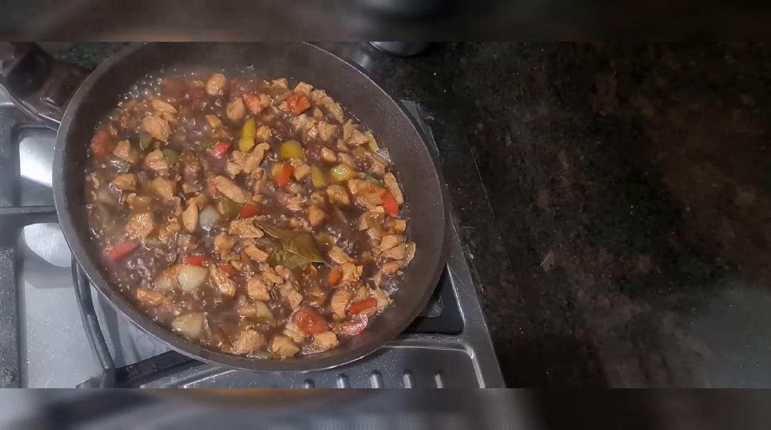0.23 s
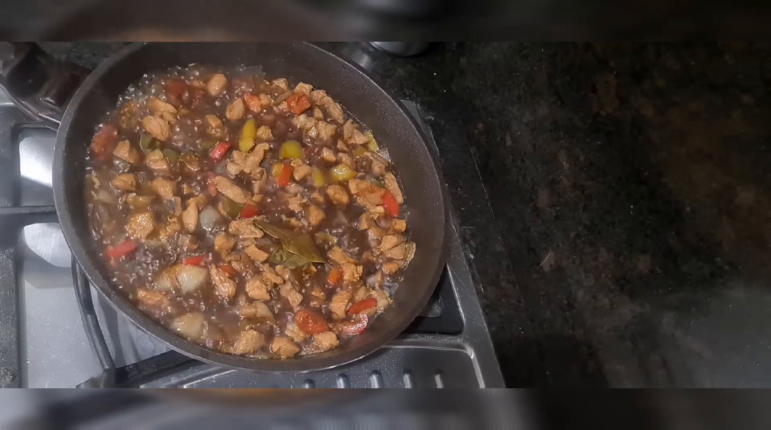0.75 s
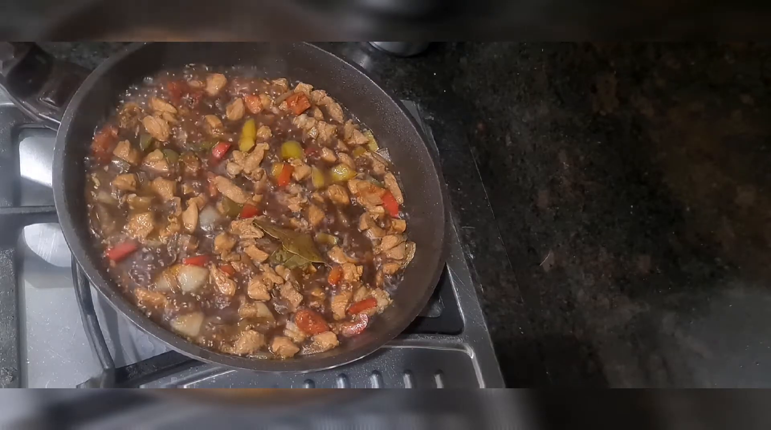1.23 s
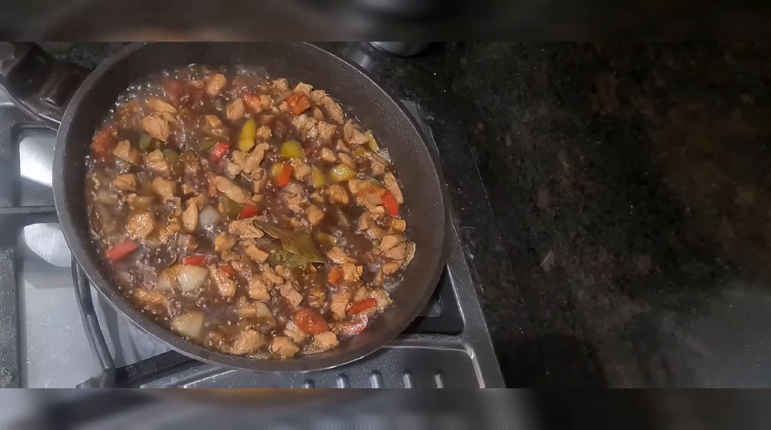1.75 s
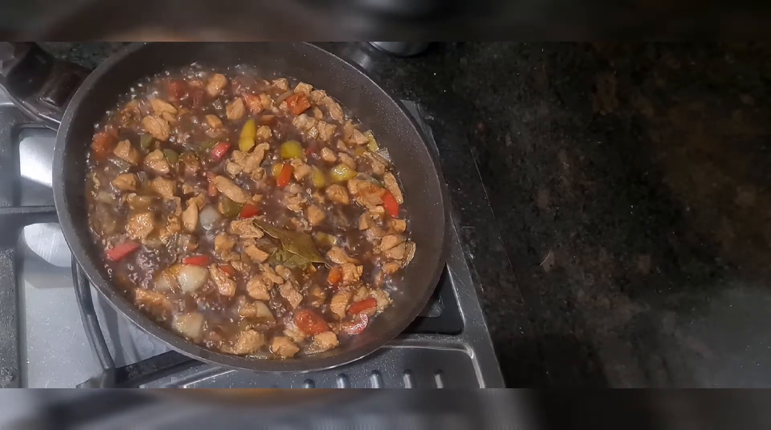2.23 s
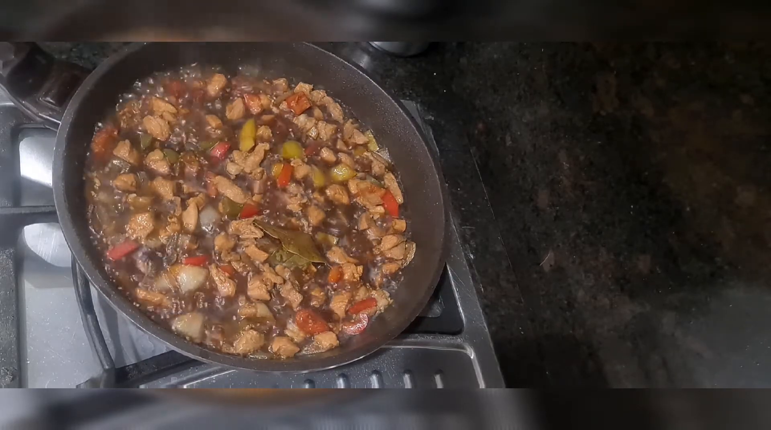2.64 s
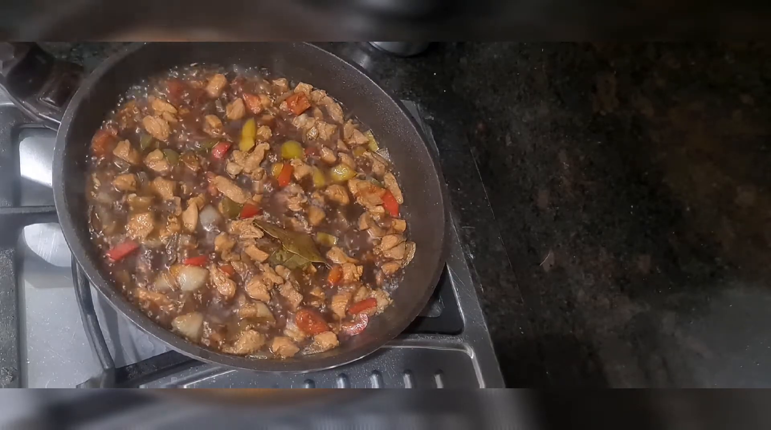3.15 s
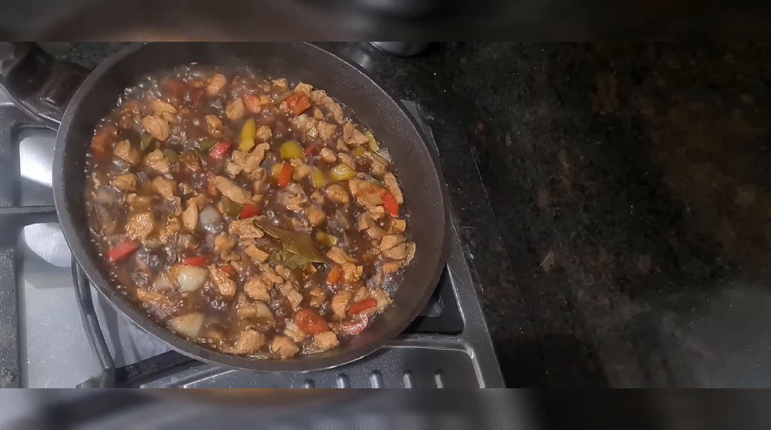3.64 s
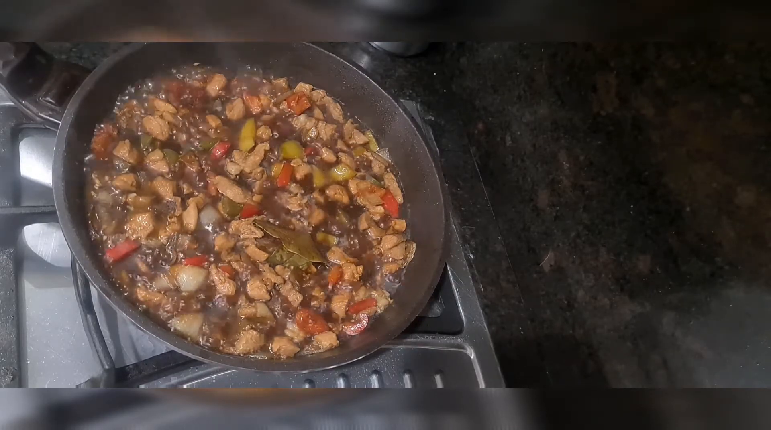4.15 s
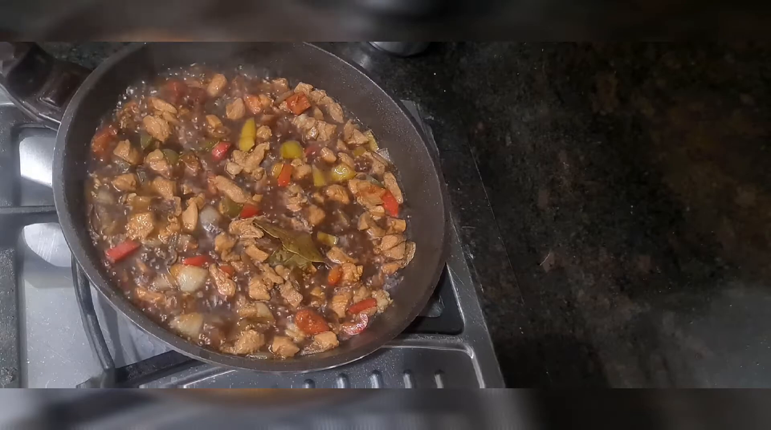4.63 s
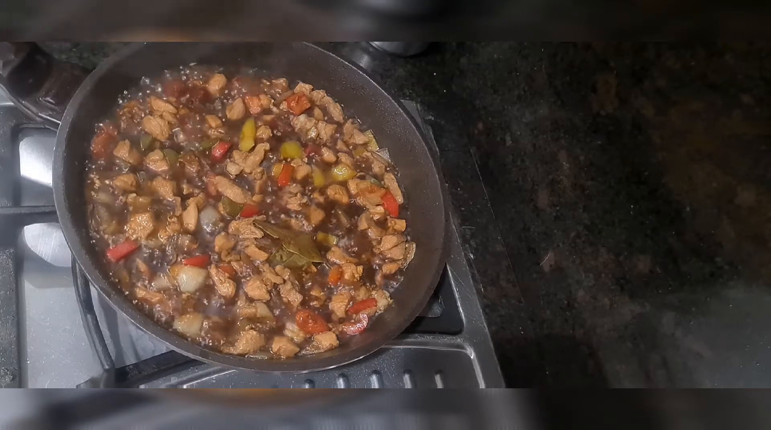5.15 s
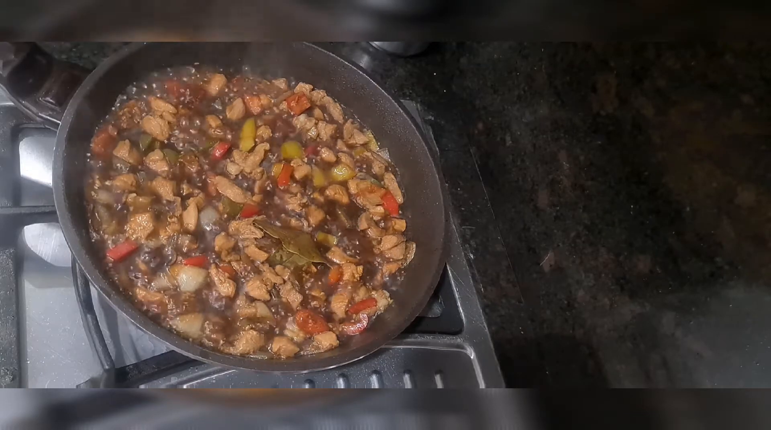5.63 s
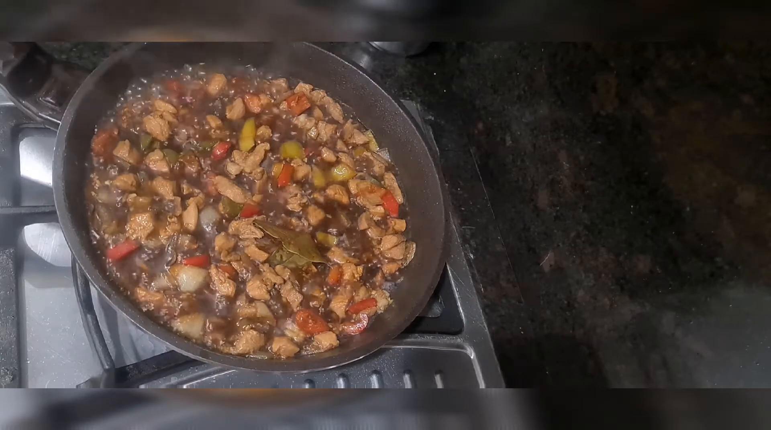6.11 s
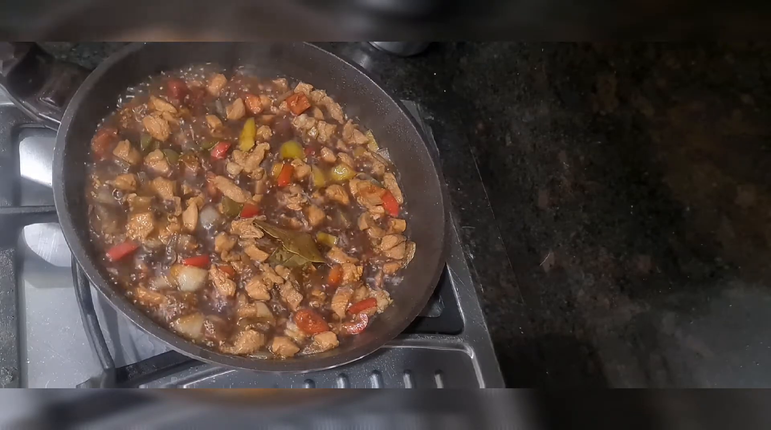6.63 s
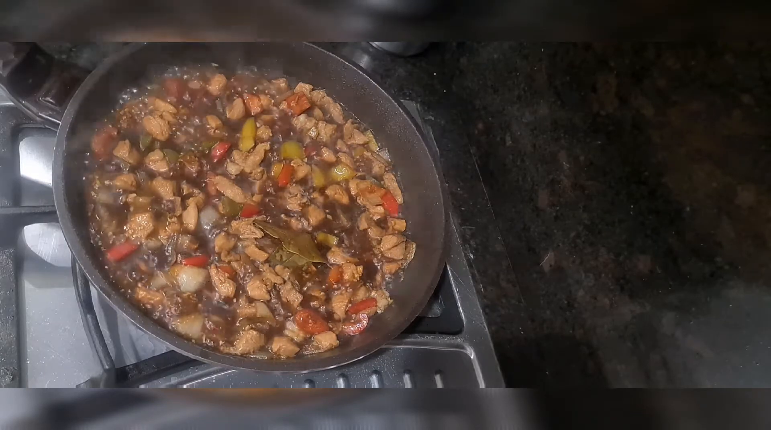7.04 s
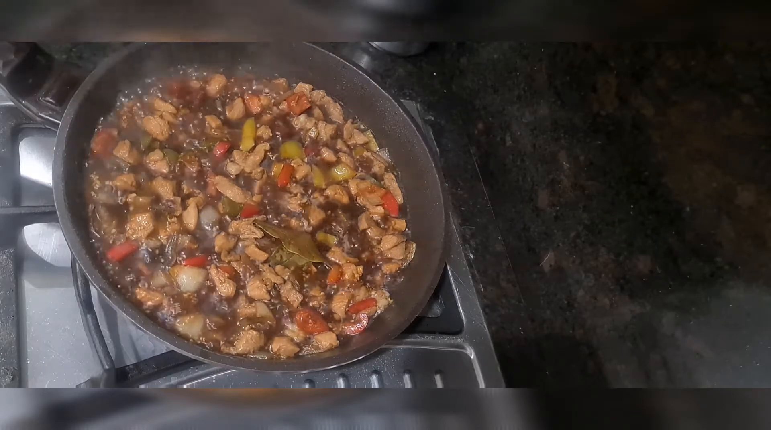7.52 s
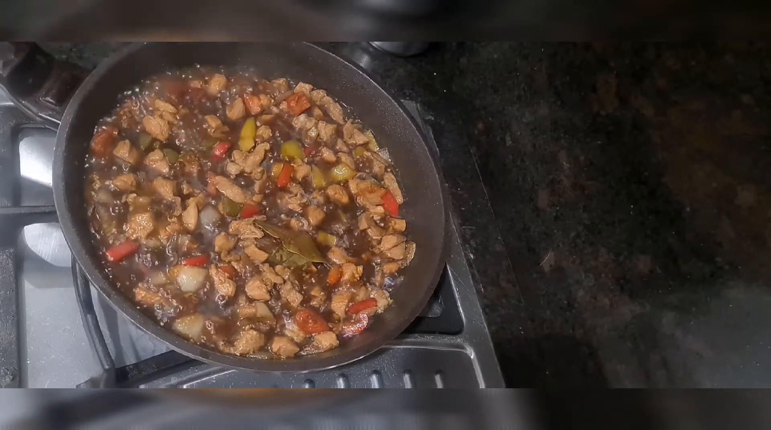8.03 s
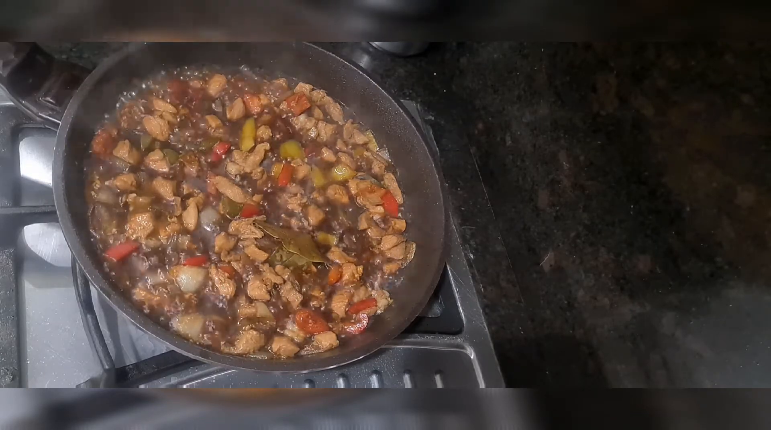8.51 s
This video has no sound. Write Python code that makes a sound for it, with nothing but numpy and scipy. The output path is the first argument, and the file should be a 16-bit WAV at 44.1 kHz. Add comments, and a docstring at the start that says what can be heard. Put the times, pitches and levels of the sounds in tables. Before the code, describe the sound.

Thick sauce simmers in a frying pan, heard close to the stove in a home kitchen. Large bubbles burst with dull, hollow knocks several times a second, while smaller ones pop, rumble and ping between them over a faint sizzle of fat. A tiny spurt of steam comes early, and a few brief, bright clatters follow. A fridge motor throbs low in the room throughout.

```python
"""A kitchen, one microphone close to the stove, where thick sauce simmers in a frying pan.
Large steam pockets slam shut with a dull double knock that rings pan and stove; small ones pop and
rumble between them, with tiny bubbles and short pings, under a fine sizzle of fat. Now and then
something clatters brightly, and steam spurts once. A fridge motor throbs low in the room."""
import sys
import numpy as np
from scipy import signal
from scipy.fft import rfft, irfft
from scipy.io import wavfile
from scipy.ndimage import uniform_filter1d

SR = 44100
rng = np.random.default_rng(int(sys.argv[2]) if len(sys.argv) > 2 else 0)


def wav_record(signal):
    """Record a signal, one row per channel, as 16-bit PCM in the file named by sys.argv[1]."""
    frames = np.transpose(np.atleast_2d(signal))
    bounded = np.clip(frames, -1, 1)
    # unit amplitude maps onto the largest positive 16-bit level
    quanta = np.round(bounded * 32767).astype(np.int16)
    wavfile.write(sys.argv[1], SR, quanta)


N = 386749
TIME = np.arange(N) / SR
TOP_HZ = 15740


def gain(db):
    return 10 ** (np.asarray(db) / 20)


def unit_rms(x):
    return x / np.sqrt(np.mean(x ** 2) + 1e-20)


def level_curve(rows):
    """Gain for each sample from rows of seconds and dB."""
    return gain(np.interp(TIME, *np.transpose(rows)))


def at_level(x, db):
    """Sets the rms of the first 45 ms."""
    return gain(db) * x / np.std(x[:round(.045 * SR)])


def add(mix, start_s, sound):
    part = mix[round(start_s * SR):][:len(sound)]
    part += sound[:len(part)]


def bandpass(x, lo_hz, hi_hz):
    sos = signal.butter(2, [lo_hz, min(hi_hz, TOP_HZ)], "bandpass", fs=SR, output="sos")
    return signal.sosfilt(sos, x)


def coloured(x, spectrum):
    """Shapes x by rows of Hz and dB; rms 1."""
    hz, db = np.transpose(spectrum)
    bins_hz = np.fft.rfftfreq(len(x), 1 / SR)
    shape = gain(np.interp(np.log(bins_hz + 1), np.log(hz), db))
    return unit_rms(irfft(rfft(x) * shape, len(x)))


def clicks(per_s, spread_db):
    """Random clicks, a few of them large."""
    size = gain(spread_db * np.minimum(rng.exponential(1, N), 4))
    return size * (rng.random(N) < per_s / SR) * rng.choice([-1, 1], N)


def wander(top_hz):
    """Random wavering at rates up to top_hz; rms 1."""
    t = np.arange(N // 64 + 1) * 64 / SR
    rates_hz = np.geomspace(top_hz / 20, top_hz, num=30)
    waves = sum(np.sin(2 * np.pi * (hz * t + rng.random())) / np.sqrt(hz) for hz in rates_hz)
    return np.interp(TIME, t, unit_rms(waves))


# The kitchen's background. Each row: frequency in Hz, relative spectral level in dB.
ROOM_SPECTRUM = [(30, 0), (60, 0), (120, 3), (240, -18.5), (310, -29), (1000, -21), (3000, -37),
                 (6000, -41.5)]
def room_tone():
    """Steady low noise all round the microphone."""
    return gain(-39.5) * coloured(rng.standard_normal(N), ROOM_SPECTRUM)


# The fridge, off in the room. Each row: frequency in Hz, level in dB, its neighbour's level in dB.
MOTOR_TONES = [(48.06, -34.5, -48.5), (100.3, -52, -66), (155, -58, -80)]
def fridge(beat_hz=1.4, beat_peak_s=0.62):
    """A motor whose tones each beat with a close neighbour; its speed wavers."""
    motor_time = np.cumsum(1 + 0.0043 * wander(1.543)) / SR
    beat = 2 * np.pi * beat_hz * (TIME - beat_peak_s)
    hum = np.zeros(N)
    for hz, db, neighbour_db in MOTOR_TONES:
        phase = 2 * np.pi * hz * motor_time
        hum += gain(db) * np.cos(phase) + gain(neighbour_db) * np.cos(phase + beat)
    return np.sqrt(2) * hum


# The fat, heard from beside the pan. Each row: time in seconds, level in dB.
SIZZLE_LEVELS = [(0, -51), (2.5, -51.5), (4.5, -51), (6.5, -51), (8.77, -51)]
# Its colour. Each row: frequency in Hz, relative spectral level in dB.
SIZZLE_SPECTRUM = [(1760, 3.5), (3000, 3), (3770, -20), (4040, -4), (5110, -3.5), (6840, -4), (8070, -1),
                   (9330, 4.5), (10600, 2.5), (12000, 5), (13200, 1), (15100, 1.5), (15700, 2.5)]
def sizzle():
    """Dense fine fizz of fat that flickers a little, the top treble partly on its own."""
    crackle = 0.39 * unit_rms(clicks(per_s=1300, spread_db=7.3))
    fizz = coloured(rng.standard_normal(N) + crackle, SIZZLE_SPECTRUM)
    treble = signal.sosfiltfilt(signal.butter(4, 11500, "highpass", fs=SR, output="sos"), fizz)
    flicker = wander(200)
    lower = (fizz - treble) * gain(1.2 * flicker + 1.03 * wander(200))
    upper = treble * gain(flicker + 1.4 * wander(200))
    return (lower + upper) * level_curve(SIZZLE_LEVELS)


# Pan and stove, close up. Each row: frequency in Hz, relative level in dB, seconds to fall 60 dB.
PAN_MODES = [(75.8, -9, 0.23), (146.5, 3, 0.057), (207, -3.5, 0.092), (237.6, -3.5, 0.067),
             (378, -10, 0.025), (416, -12, 0.021), (462, 0, 0.089), (513, -2, 0.035), (698.5, 6.5, 0.082),
             (801.7, 6, 0.077), (831, 0, 0.09), (997, 0.5, 0.075), (1080, -6.5, 0.18), (1060, -10, 0.02),
             (1339, 6.5, 0.04), (1400, -4.5, 0.056), (1663, -2, 0.047), (1855, 0, 0.048), (2145, -4, 0.022),
             (2227, -9, 0.052), (2325, 4.5, 0.024), (2672, 1, 0.041), (2890, -9.5, 0.018),
             (3240, -15, 0.046), (3674, -9, 0.058), (4500, -31, 0.05), (5970, -9, 0.026)]
THUD_TOP_HZ, HOLLOW_TOP_HZ, RATTLE_TOP_HZ = 300, 600, 1200
def pan_modes(lo_hz, hi_hz, pitch=1, damping=1, samples=SR // 4):
    """Pan and stove ring as decaying sines between two frequencies; energy 1."""
    t = np.arange(samples) / SR
    rings = sum(gain(db - 60 * damping * t / t60) * np.sin(2 * np.pi * hz * pitch * t)
                for hz, db, t60 in PAN_MODES if lo_hz <= hz < hi_hz)
    return rings / np.linalg.norm(rings)


def ring(force, lo_hz, hi_hz):
    """A force drives the pan's modes in one band."""
    return signal.oaconvolve(force, pan_modes(lo_hz, hi_hz))[:N]


def pan(thud, rattle, tick, struck=0):
    """Soft blows ring the low modes, rough contact the middle, sharp contact the high ones."""
    low = bandpass(ring(thud, 0, THUD_TOP_HZ), 84, 530)
    hollow = ring(0.19 * thud + 0.5 * rattle, THUD_TOP_HZ, HOLLOW_TOP_HZ)
    middle = 0.57 * ring(rattle, HOLLOW_TOP_HZ, RATTLE_TOP_HZ)
    high = ring(tick, RATTLE_TOP_HZ, SR)
    splat = 1.22 * bandpass(tick, 1900, 3500) + 0.34 * bandpass(rattle, 610, 1500)  # straight to the air
    notch = signal.iirnotch(308, 4.5, SR)  # the pan radiates little between its low and middle modes
    return signal.lfilter(*notch, low + hollow + middle + high + splat + struck)


# The smallest steam pockets in the pan. Each row: time in seconds, relative level in dB.
SIMMER_LEVELS = [(0, -49), (.3, -44), (.7, -49), (1.3, -44.5), (1.9, -42.5), (3.3, -44), (5, -44.5),
                 (7.2, -43.5), (7.6, -45.5), (8.1, -46.5), (8.77, -42)]
def simmer():
    """Many tiny pockets tap the pan in loose clumps and fall quiet while a large pocket swells."""
    knock_times = np.array([row[0] for row in DOUBLE_KNOCKS] + [np.inf])
    until_knock = knock_times[np.searchsorted(knock_times, TIME)] - TIME
    level = level_curve(SIMMER_LEVELS) * gain(-7 * np.exp(-(until_knock / 0.056) ** 2))
    clumps = gain(4.2 * np.minimum(wander(90), 1.5))
    taps = unit_rms(clicks(per_s=500, spread_db=2.1) * clumps) * level
    pats = unit_rms(clicks(per_s=120, spread_db=5.5)) * level
    return pan(thud=1.73 * pats, rattle=1.14 * taps, tick=0.33 * taps)


# Large pockets, close to the microphone. Each row: start in seconds, first blow in dB, gap in ms,
# second blow in dB, contact in dB, seven ring levels in dB (modes near 460, 700, 810, 1000, 1340,
# 2300 and 2700 Hz), snap in dB.
DOUBLE_KNOCKS = [(0.0415, -27, 14.2, -22.5, -36, -37.5, -47, -35.5, -44, -49, -51, -53, -57),
                 (0.206, -23, 13, -21, -38, -33, -49, -36.5, -50, -45, -54, -59, -56),
                 (0.5004, -16, 9.8, -13, -39, -34, -38.5, -37, -51, -46, -41.5, -49, -53.5),
                 (0.6209, -29, 5.1, -16, -37, -28, -36.5, -42, -44, -49, -62, -50, -62),
                 (0.7573, -29, 7.7, -18, -30, -42, -41, -33, -42, -42, -42.5, -56, -57),
                 (0.8893, -27, 7.5, -17.5, -40, -40, -35, -33.5, -55, -41, -49, -51, -59),
                 (1.0242, -18.5, 7.4, -21, -36, -44, -35.5, -45, -47, -41.5, -50.5, -65, -56.5),
                 (1.151, -33, 11.4, -15.5, -43, -38, -36, -42, -41, -51, -48, -52, -57),
                 (1.474, -21, 11, -19.5, -40.5, -42, -46, -34.5, -43, -45, -51, -59, -56),
                 (1.6225, -24, 7.3, -17.5, -33, -36, -40, -39, -48, -49, -50, -60, -55),
                 (1.7624, -25, 10.4, -13.5, -50, -30.5, -32.5, -35, -56, -54, -49, -65, -57),
                 (1.888, -21.5, 8.6, -17, -47, -41, -33.5, -36.5, -44, -48, -55, -52, -57),
                 (2.0028, -17.5, 11.5, -27, -39, -39.5, -42, -37, -41, -50, -56, -57, -57),
                 (2.134, -21, 16.5, -32, -50, -37, -39.5, -33.5, -53, -45, -53, -56, -62),
                 (2.607, -23, 11.7, -20.5, -39, -37.5, -46, -38.5, -39, -50, -47.5, -54, -57),
                 (2.8091, -19, 11.4, -21, -35, -33, -51, -41, -46, -56, -50, -55, -56),
                 (3.305, -25, 10.5, -18.5, -39, -32, -41, -52, -47, -53, -49, -52, -56),
                 (3.4222, -25, 10.1, -17.5, -48, -31, -45, -31, -46, -54, -49.5, -63, -68),
                 (3.54, -23, 3.1, -22.5, -41.5, -32, -36, -36, -42, -47, -55, -59, -57),
                 (3.752, -30, 9.4, -15, -37, -52, -51, -34.5, -54, -42.5, -46.5, -60, -60),
                 (3.897, -16.5, 11, -23, -40, -34, -41, -32.5, -39, -37, -43, -56, -49.5),
                 (4.037, -19, 13.6, -26, -43, -39, -33.5, -40, -45, -47, -52, -68, -53.5),
                 (4.2875, -26, 6.2, -18.5, -37, -33.5, -45, -43, -46, -49, -48.5, -54, -56),
                 (4.4803, -20, 5.2, -44, -45, -35.5, -39.5, -57, -49, -45, -53, -57, -59),
                 (4.725, -19.5, 13, -16, -39, -38, -40, -38.5, -49, -48, -52, -56, -58),
                 (4.9479, -24, 10.2, -18, -43, -44, -41, -35, -49, -54, -49, -54, -57),
                 (5.194, -33, 8.2, -18.5, -36, -42, -37, -45, -48, -51, -49, -56, -57),
                 (5.357, -18, 12.8, -22, -39, -44, -34, -44, -44, -48, -51, -50.5, -52.5),
                 (5.608, -18, 10.76, -24, -36, -39.5, -35, -40, -60, -50, -50, -58, -54.5),
                 (5.967, -19, 10.6, -17, -40.5, -32, -37, -37, -48, -62, -53, -51, -53),
                 (6.329, -20, 11.3, -18, -41, -41, -45, -37.5, -43, -49, -53, -50, -54),
                 (6.4732, -15.5, 10.9, -18, -36, -31, -37, -42, -44, -47, -52, -54, -53),
                 (6.71, -29, 10.8, -22.5, -41.5, -39.5, -30, -39, -55, -49, -55, -52, -57),
                 (6.928, -20, 9.7, -21, -40.5, -40, -39, -44, -47, -43, -48, -55, -62),
                 (7.146, -21, 15.5, -26, -43, -37, -34.5, -38, -44, -62, -50, -56, -54.5),
                 (7.3748, -17.5, 9.7, -16.5, -38, -34, -54, -45, -54, -48, -52, -55, -56.5),
                 (7.704, -24, 9.1, -13, -35, -32, -28, -36.5, -50, -43, -53, -45.5, -52),
                 (7.832, -16.5, 10.5, -25, -35, -34.5, -59, -43, -41.5, -48, -49, -54, -52.5),
                 (8.14, -22.5, 10.3, -17, -35, -40, -35.5, -40, -47, -43, -48, -50.5, -55.5),
                 (8.2698, -16.5, 8.4, -18.5, -42, -31.5, -36, -37, -53, -51, -57, -56, -54.5),
                 (8.385, -16.5, 3.05, -19, -41, -34, -42, -46, -46, -45, -53, -59, -58),
                 (8.5089, -22, 7.5, -17, -39.5, -34.5, -38, -37, -46, -58, -53, -51, -53.5),
                 (8.6139, -26.5, 19.3, -20, -42.5, -40.5, -35, -36, -49, -49, -50, -55, -56)]
# The bands of modes that a knock rings. Each entry: a band edge in Hz.
BAND_EDGES = [300, 600, 760, 900, 1200, 1500, 2000, 2500, 3000]
INWARD_BLOW = -signal.windows.hann(40)
def knocks():
    """A steam pocket slams shut in two blows; the spot struck sets which modes ring."""
    thud, rattle, tick, struck = np.zeros((4, N))
    t = np.arange(3000) / SR
    bands = [(lo, hi) for lo, hi in zip(BAND_EDGES, BAND_EDGES[1:]) if lo != 1500]
    for first_s, first_db, gap_ms, second_db, contact_db, *rings_db, snap_db in DOUBLE_KNOCKS:
        second_s = first_s + gap_ms / 1000
        add(thud, first_s, gain(first_db) * INWARD_BLOW)
        add(thud, second_s, gain(second_db) * INWARD_BLOW)
        contact_s = first_s - 0.002  # contact starts early, lasts to the second blow, then dies
        after = np.maximum(contact_s + t - second_s, 0)
        rough, sharp, snap = rng.standard_normal((3, len(t))) * np.minimum(t / 0.0011, 1)
        rough *= np.minimum(t / 0.0027, 1) * (1.57 * np.exp(-t / 0.001) + 0.37 * np.exp(-after / 0.01))
        second_click = 0.12 * (after > 0) * np.exp(-after / 0.00064)
        sharp *= 0.38 * np.exp(-t / 0.003) + 0.49 * np.exp(-after / 0.018) + second_click
        snap *= 1.9 * np.exp(-t / 0.0075) + 0.36 * np.exp(-after / 0.015)
        pitches = 1 + 0.015 * rng.standard_normal(len(bands))  # heaving sauce shifts and damps the modes
        for (lo, hi), db, pitch in zip(bands, rings_db, pitches):
            rings = pan_modes(lo, hi, pitch, damping=1.5, samples=2500)
            force = sharp if lo >= RATTLE_TOP_HZ else rough
            add(struck, contact_s, at_level(signal.fftconvolve(force, rings), db))
        add(rattle, contact_s, gain(contact_db - 7.5) * rough)
        add(tick, contact_s, gain(contact_db - 9.5) * sharp)
        snap = bandpass(bandpass(snap, 2070, 12800), 2000, 7400)
        add(struck, contact_s, at_level(snap, snap_db))
    return pan(thud, rattle, tick, struck)


# Small pockets that stand out at the stove. Each row: start in seconds, rattle in dB, thud in dB.
CLEAR_POPS = [(.106, -44, -28), (.408, -32, -26), (.733, -27, -28), (1.124, -47, -33), (1.377, -32, -34),
              (1.592, -31, -35), (2.29, -30, -26), (2.392, -36, -34), (2.716, -34, -28), (2.892, -32, -53),
              (2.991, -32, -46), (3.021, -33, -40), (3.108, -27, -22), (3.145, -32, -27), (3.177, -30, -35),
              (3.561, -20.5, -25), (4.165, -32, -28.5), (4.596, -28.5, -26), (5.081, -28, -37),
              (5.435, -33, -34), (5.51, -29, -28), (5.731, -32, -43), (5.765, -45, -26), (5.853, -48, -29),
              (6.035, -34, -31), (6.132, -31.5, -39), (6.186, -27, -22.5), (6.219, -27, -26),
              (6.249, -26.5, -33), (7.227, -33, -46), (7.433, -34, -31), (7.522, -29.5, -29),
              (7.98, -31, -30.5), (8.01, -28.5, -41)]
def pops(faint_count=120):
    """Small pockets strike the pan once; faint ones fall at random among the clear ones."""
    thud, rattle, tick = np.zeros((3, N))
    t = np.arange(3000) / SR
    envelope = np.minimum(t / 0.0011, 1) * np.exp(-t / 0.0046)
    faint_db = rng.normal([-39, -43], 4, (faint_count, 2))
    faint_pops = np.c_[rng.random(faint_count) * N / SR, faint_db]
    for start_s, rattle_db, thud_db in [*CLEAR_POPS, *faint_pops]:
        rough, sharp = rng.standard_normal((2, len(t))) * envelope
        add(thud, start_s, gain(thud_db) * INWARD_BLOW)
        add(rattle, start_s, gain(rattle_db) * rough)
        add(tick, start_s, gain(rattle_db - 13) * sharp)
    return pan(thud, rattle, tick)


def blips():
    """Tiny surface bubbles burst at random as short rising tones, the higher ones fainter."""
    out, t = np.zeros(N), np.arange(900) / SR
    envelope = np.minimum(t / .0015, 1) * np.exp(-t / 0.0055)
    for hz in np.geomspace(1100, 6200, num=14):
        chirp = np.sin(2 * np.pi * hz * t * (1 + 4 * t)) * envelope
        out += signal.oaconvolve(clicks(per_s=2.8, spread_db=2.5), chirp)[:N] * (1100 / hz) ** 0.87
    return gain(-50.5) * out


# Short clear pings at the pan between the knocks, many ringing with the pops and clatters.
# Each row: start in seconds, pitch in Hz, level in dB.
PAN_PINGS = [(0.285, 1380, -49), (0.285, 3100, -45), (0.288, 1260, -49), (0.291, 565, -42),
             (0.404, 390, -41), (0.739, 2070, -50), (0.816, 2980, -48), (0.861, 1240, -48),
             (0.861, 1370, -47), (0.868, 3220, -45), (0.868, 4820, -55), (0.947, 6550, -61),
             (0.957, 1245, -41), (1.328, 7320, -55), (1.349, 428, -37), (1.353, 805, -38),
             (1.549, 3440, -49), (1.81, 2720, -37), (1.853, 3230, -39), (1.933, 4820, -58),
             (1.935, 2930, -49), (1.949, 2090, -43), (1.956, 1240, -49), (1.958, 860, -37),
             (1.958, 4800, -52), (1.96, 2670, -45), (1.96, 3360, -54), (2.003, 6000, -54),
             (2.259, 1430, -46), (2.388, 513, -40), (2.437, 526, -39), (2.562, 2090, -48),
             (2.562, 4820, -55), (2.569, 4050, -54), (2.71, 1160, -45), (2.89, 2410, -44),
             (2.986, 390, -41), (2.989, 1380, -47), (3.016, 382, -41), (3.05, 777, -40), (3.101, 1160, -44),
             (3.103, 523, -34), (3.106, 644, -43), (3.106, 2230, -49), (3.112, 960, -48), (3.14, 520, -41),
             (3.141, 390, -40), (3.143, 840, -35), (3.172, 470, -40), (3.661, 452, -36), (3.933, 1390, -39),
             (3.94, 3030, -49), (3.945, 1380, -43), (4.145, 6120, -59), (4.16, 390, -44),
             (4.167, 2320, -47), (4.214, 514, -42), (4.411, 5940, -55), (4.59, 468, -34),
             (4.595, 2320, -48), (5.076, 1460, -53), (5.079, 820, -42), (5.08, 6120, -59),
             (5.124, 784, -38), (5.125, 5510, -57), (5.285, 690, -38), (5.36, 3280, -50), (5.428, 560, -46),
             (5.507, 690, -38), (5.507, 833, -35), (5.508, 1430, -48), (5.508, 6120, -50),
             (5.512, 2650, -45), (5.533, 5680, -58), (5.727, 390, -38), (5.739, 950, -45),
             (6.183, 470, -41), (6.184, 644, -44), (6.184, 1420, -50), (6.213, 520, -48),
             (6.217, 6030, -54), (6.243, 850, -40), (6.244, 1380, -46), (6.376, 647, -44),
             (6.527, 910, -46), (6.597, 520, -40), (6.768, 645, -48), (7.049, 960, -47), (7.197, 650, -45),
             (7.213, 3360, -52), (7.219, 1420, -50), (7.225, 2820, -45), (7.431, 686, -41),
             (7.492, 904, -39), (7.493, 643, -36), (7.521, 6200, -58), (7.544, 6100, -54),
             (7.547, 6980, -55), (7.765, 6120, -60), (7.952, 690, -38), (8.003, 850, -42),
             (8.039, 2800, -52), (8.04, 1970, -45), (8.04, 3440, -55), (8.042, 4360, -57),
             (8.592, 2150, -51)]
def pings():
    """Each ping is a decaying sine of steady pitch; low ones ring longer."""
    out, t = np.zeros(N), np.arange(2500) / SR
    for start_s, hz, db in PAN_PINGS:
        decay_s = 0.006 + 4 / hz
        envelope = np.minimum(t / (0.28 * decay_s), 1) * np.exp(-t / decay_s)
        add(out, start_s, gain(db) * np.sqrt(2) * np.sin(2 * np.pi * hz * t) * envelope)
    return out


# Bright clatters by the pan. Each row: start in seconds, level in dB, low and high band edge in Hz,
# seconds for the tail to fall 60 dB.
BRIGHT_CLATTERS = [(0.868, -45, 1100, 3220, 0.078), (0.96, -50, 1170, 1460, 0.043),
                   (1.806, -37, 1190, 7460, 0.15), (1.855, -30, 870, 1640, 0.22),
                   (1.856, -33.5, 2150, 3660, 0.16), (2.085, -50.5, 1500, 6000, 0.05),
                   (1.889, -54, 2980, 7900, 0.087), (1.934, -44.5, 1590, 5400, 0.45),
                   (2.525, -35, 1480, 7600, 0.19), (2.53, -38.5, 527, 1400, 0.092),
                   (3.192, -54, 1500, 5500, 0.26), (3.857, -37.5, 1050, 3940, 0.14),
                   (3.899, -36, 1210, 4400, 0.1), (8.546, -36, 835, 6900, 0.18),
                   (0.286, -50, 1100, 2200, 0.071), (1.162, -38, 2400, 3150, 0.036),
                   (5.035, -51.5, 1500, 5000, .05), (7.548, -48, 1490, 5100, .06),
                   (8.042, -47, 1500, 6000, 0.039)]
def clatters():
    """Bursts of clumped grit, each in its own band: a crack, then a duller tail; part rings the pan."""
    out, t = np.zeros(N), np.arange(8000) / SR
    attack = np.minimum(t / 0.00073, 1)
    for start_s, db, lo_hz, hi_hz, t60 in BRIGHT_CLATTERS:
        grit, crack, clumps = rng.standard_normal((3, len(t)))
        clumps_db = 0.28 * unit_rms(uniform_filter1d(clumps, 150))
        tail = signal.lfilter([1], [1, -.8], grit) * gain(clumps_db - 60 * t / t60)
        burst = bandpass(tail + 1.9 * crack * np.exp(-t / 0.0059), lo_hz, hi_hz)
        burst = bandpass(burst, 0.077 * lo_hz, 0.72 * hi_hz)
        add(out, start_s, gain(db) * burst / np.std(burst[:600]) * attack)
    return out + 0.47 * ring(out, THUD_TOP_HZ, SR)


# Steam whistling at the pan. Each row: centre in Hz, width in Hz, level in dB.
STEAM_WHISTLES = [(12000, 120, -58), (15200, 200, -55), (15650, 100, -58)]
def steam_spurt(peak_s=.885, hold_s=.045, rise_db_per_s=500, fall_db_per_s=302):
    """One bright spurt of steam that whistles faintly."""
    since = TIME - peak_s
    envelope_db = rise_db_per_s * np.minimum(since, 0) - fall_db_per_s * np.maximum(since - hold_s, 0)
    hiss = gain(-47) * unit_rms(bandpass(rng.standard_normal(N), 7900, 17000))
    for hz, width_hz, db in STEAM_WHISTLES:
        whistle = bandpass(rng.standard_normal(N), hz - width_hz / 2, hz + width_hz / 2)
        hiss += gain(db) * unit_rms(whistle)
    return hiss * gain(envelope_db)


def room_echoes(x):
    """The kitchen returns sparse echoes of random sign after a short delay; treble dies sooner."""
    echoes = np.zeros(SR // 2)
    slots = np.arange(300, len(echoes) - 20, 20)
    echoes[slots + rng.integers(0, 20, len(slots))] = rng.choice([-1, 1], len(slots))
    hz, t, spectrum = signal.stft(echoes, SR, nperseg=256)
    t60 = np.interp(hz, [200, 1500, 8000], [.3, .3, .2])
    _, tail = signal.istft(spectrum * gain(-60 * t / t60[:, None]), SR, nperseg=256)
    return signal.fftconvolve(x, tail / np.linalg.norm(tail))[:N]


def scene():
    """At the stove: the hits with a little of the room, over the steady layers and the spurt."""
    steady = room_tone() + fridge() + sizzle() + simmer()
    hits = knocks() + pops() + blips() + pings() + clatters()
    return (steady + hits + steam_spurt() + gain(-16) * room_echoes(hits))[None]


def record(dry):
    """The mono microphone loses the deepest bass; the treble ends at TOP_HZ."""
    thin = signal.sosfilt(signal.butter(2, 36, "highpass", fs=SR, output="sos"), dry)
    lowpass = signal.firwin(1023, TOP_HZ, window=("kaiser", 10), fs=SR)
    return signal.oaconvolve(thin, lowpass[None], "same")


dry = scene()
out = record(dry)
wav_record(out)
```